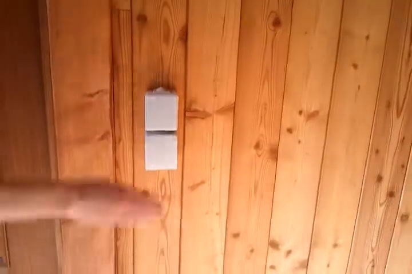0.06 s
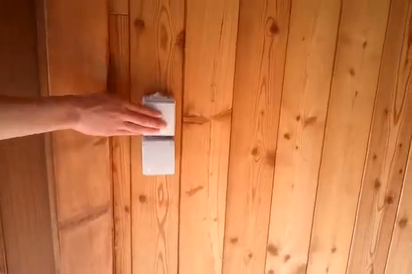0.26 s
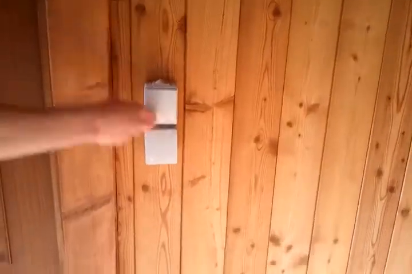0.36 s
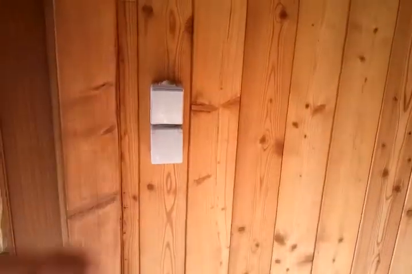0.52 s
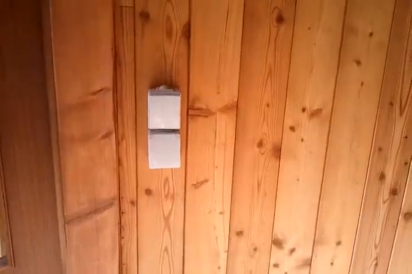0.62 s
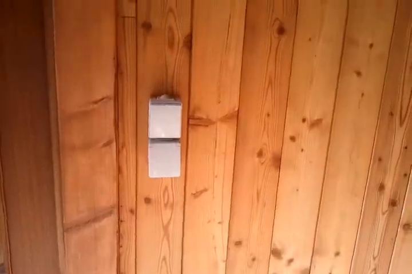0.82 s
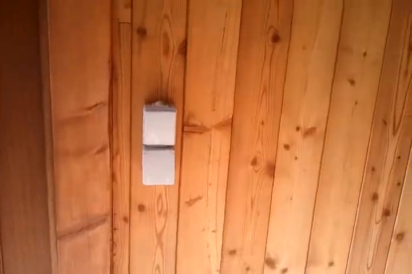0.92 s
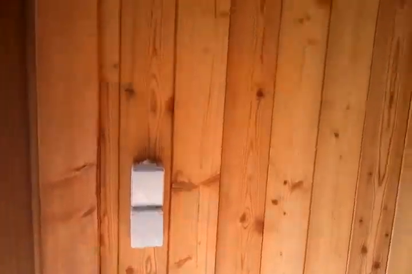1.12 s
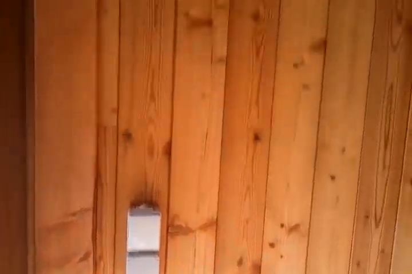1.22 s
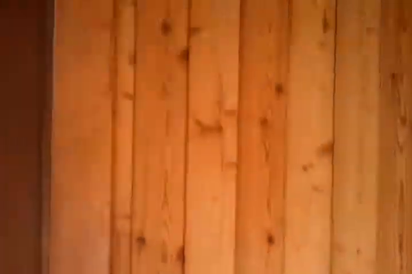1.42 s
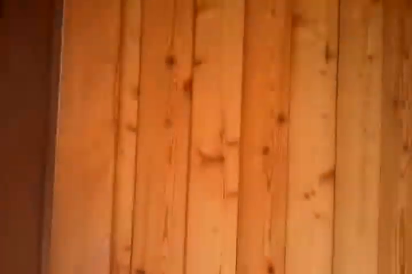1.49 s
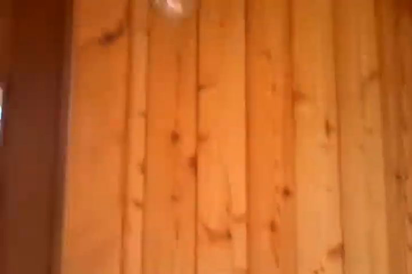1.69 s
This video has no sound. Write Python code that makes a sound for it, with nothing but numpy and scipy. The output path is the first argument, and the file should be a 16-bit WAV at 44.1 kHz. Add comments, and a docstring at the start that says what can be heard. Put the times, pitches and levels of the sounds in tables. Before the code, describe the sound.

A wall switch is pressed with one sharp plastic click, close by, ringing briefly in a small wood-panelled room. Clothing rustles softly afterwards, while birds chirp faintly outside and the hand-held microphone picks up slight bumps.

```python
"""A sharp plastic click, close by: a rocker switch tips, snaps over and chatters on the pine-panelled wall
of a small room, and the boards and the room ring after it. Birds chirp farther off, outside, their calls
scattered by the walls. Clothing rustles as the arm drops. The one microphone, on a hand-held camera,
picks up soft bumps and rumble from the hand over faint outdoor hiss and mains hum."""
import sys
import numpy as np
from scipy import signal
from scipy.fft import rfft, irfft, next_fast_len
from scipy.io import wavfile
from scipy.ndimage import map_coordinates

SR = 44100
rng = np.random.default_rng(int(sys.argv[2]) if len(sys.argv) > 2 else 0)


def output_pcm(signal):
    """Save a mono or channel-first signal as 16-bit PCM at the path in sys.argv[1].

    Samples are clipped to [-1, 1] before scaling.
    """
    pcm = np.clip(np.atleast_2d(signal).T, -1, 1) * 32767
    wavfile.write(sys.argv[1], SR, np.round(pcm).astype(np.int16))


N = 77175

# outdoor hiss as heard indoors (frequency [Hz], level [dB])
AIR_SPECTRUM = [(100, -29.5), (300, -6.5), (800, -11.5), (1600, -13.5), (2200, -7), (2750, 2), (3600, -5.5),
                (4500, -10), (5000, 1.5), (5700, -11.5), (7200, -10), (9000, -19), (14000, -21)]
# mains hum (frequency [Hz], level [dB])
HUM_PARTIALS = [(49.6, -62.5), (99.3, -62.5), (198, -78.5), (301, -79.5)]
# bumps on the camera body (time [s], peak level [dB], width [s])
CAMERA_BUMPS = [(.185, -24.5, 0.00023), (0.1865, -36, 0.0011), (0.31, -30, 0.0013),
                (0.3622, -37.5, 0.00017), (0.542, -36, 0.0031), (0.691, -39, 0.0023),
                (0.714, -35.5, 0.0014), (1.512, -38.5, 0.000039), (1.6645, -24.5, 0.0001)]
# course of the handling rumble (time [s], level [dB])
RUMBLE_LEVELS = [(0.0, -62.5), (0.13, -59), (0.228, -38), (0.276, -42.5), (0.316, -42), (0.336, -44),
                 (0.57, -49.5), (0.628, -67), (0.658, -48), (0.828, -48.5), (0.848, -60.5), (1.106, -55.5),
                 (1.15, -55.5), (1.75, -59)]
# colour of that rumble (frequency [Hz], level [dB])
RUMBLE_SPECTRUM = [(15, 2), (30, 2), (50, 1.5), (75, -7.5), (130, -13.5), (250, -30.5), (500, -47),
                   (1500, -75)]
# strokes of cloth (time [s], rise [s], t60 [s], hiss level [dB], swish level [dB])
CLOTH_STROKES = [(0.116, .006, 0.17, -59.5, -62.5), (0.386, 0.0086, 0.2, -59, -51),
                 (0.522, 0.0049, 0.085, -60, -60), (0.772, 0.02, 0.27, -44.5, -46),
                 (1.146, .01, 0.2, -63, -50.5), (1.15, 0.15, 0.81, -49.5, -68),
                 (1.411, 0.015, 0.15, -59, -66)]
# bright hiss of the cloth (frequency [Hz], level [dB])
HISS_SPECTRUM = [(200, -34), (1200, -16), (2000, -3.5), (2650, 6.5), (3700, -5.5), (6000, -10), (9000, -10),
                 (12000, -14), (14500, -17)]
# lower swish of the cloth (frequency [Hz], level [dB])
SWISH_SPECTRUM = [(60, 0), (350, 2.5), (600, -4), (1500, -7.5), (2300, 0.5), (3200, -2.5), (4300, -1),
                  (6000, -14), (12000, -19.5)]
# single whistles (time [s], length [s], start pitch [Hz], end pitch [Hz], bend [1 = straight glide],
# level [dB], direct sound over the echo [dB])
BIRD_WHISTLES = [(0.011, 0.055, 3300, 5030, 2.3, -53.5, -12), (0.116, 0.024, 2700, 3250, 1.53, -60, 0),
                 (.345, 0.041, 2700, 3765, 0.98, -63, -3.5), (.391, 0.0098, 3180, 3200, 0.76, -59, 6),
                 (0.46, .035, 2670, 3906, 1.47, -59.5, 1.5), (0.567, 0.031, 2710, 3990, 1.07, -58.5, -2),
                 (.634, 0.092, 4470, 5540, 4, -51, 1.5), (0.886, 0.042, 2370, 2860, 1.2, -52.5, -1.5),
                 (0.974, .075, 3133, 4495, 1.3, -53, -19), (1.287, 0.026, 3950, 3350, 1.05, -55, -8),
                 (1.524, 0.048, 5360, 5580, 4.4, -61.5, 2.5), (1.595, 0.029, 2800, 5130, 1.18, -52.5, -14),
                 (1.691, 0.023, 3500, 3140, 1.5, -56.5, 2)]
# falling two-voiced chips (time [s], length [s], upper voice [Hz], lower voice [Hz],
# upper level [dB], lower level [dB])
BIRD_CHIPS = [(0.104, 0.035, 7920, 6250, -57, -60.5), (0.173, 0.028, 7086, 6080, -47.5, -56),
              (0.372, 0.066, 8110, 6300, -56, -60.5), (0.53, 0.049, 8200, 6240, -57.5, -65.5),
              (0.711, 0.052, 8250, 6500, -58.5, -65), (1.108, 0.03, 7470, 6350, -56.5, -60),
              (1.624, 0.072, 7580, 6166, -61, -60.5)]
# reverberation of the small room (frequency [Hz], t60 [s])
ROOM_DECAY = [(200, .26), (1000, 0.22), (2300, 0.2), (6000, .21), (13000, 0.21)]
# colour of the click in the room (frequency [Hz], level [dB])
ECHO_SPECTRUM = [(150, -11), (255, -21), (340, -16), (460, -8), (580, -17.5), (780, -6.5), (980, -15.5),
                 (1400, -4), (1750, -5), (2300, 0), (2800, -13), (3150, -9), (3700, -17), (5600, -18),
                 (6200, -11.5), (7400, -22), (8800, -17.5), (11000, -26), (13000, -24.5), (14500, -35.5)]
# modes of the wall boards (frequency [Hz], level [dB], t60 [s])
BOARD_MODES = [(322.6, -12.5, .26), (446, -10, .28), (750, -7, 0.22), (1410, -7, 0.2), (1616, -6.5, 0.27),
               (1680, -8.5, 0.18), (1864, -4.5, .16), (2050, 4, .16), (2130, -4, .18), (2261, 2, .16),
               (2425, 1.5, .16), (2470, -3.5, .16), (2602, -1.5, 0.094), (3117, -10, 0.18)]
# modes of the plastic rocker and its housing (frequency [Hz], level [dB], t60 [s])
ROCKER_MODES = [(413, -24.5, 0.078), (729, -10.5, 0.018), (1294, -17, 0.052), (1560, -12, 0.029),
                (2182, 0.5, 0.023), (2556, -0.5, 0.019), (3210, -8, .022), (4050, -17, .02),
                (4410, -12, 0.022), (6540, -6.5, 0.013), (7985, -16, 0.031), (8490, -11, 0.018),
                (12540, -38, 0.0096)]
# the rocker tips, then snaps over (time [s], level [dB])
ROCKER_BLOWS = [(0.2068, -20.5), (0.2129, -4)]
# sharp contacts as the mechanism chatters (time [s], level [dB])
CHATTER = [(0.205, -50), (0.2094, -41), (.2135, -14.5), (.2146, -13), (.2158, -21), (.2168, -14),
           (0.2214, -16)]
# crack of each contact (frequency [Hz], level [dB])
CRACK_SPECTRUM = [(200, -8), (1000, -10), (2300, 13), (3700, -11), (4400, -2), (6000, -19), (9000, -1),
                  (11000, -12.5), (12700, -4), (14000, -27)]

SNAP_S = 0.214


def amp(db):
    return 10 ** (np.asarray(db) / 20)


def unit_rms(x):
    return x / np.sqrt(np.mean(x ** 2) + 1e-20)


def along(points, hz):
    """Read (frequency, value) points on a log frequency axis."""
    freqs, values = np.transpose(points)
    return np.interp(np.log(hz + 1), np.log(freqs + 1), values)


def since(s):
    """Seconds since s, zero before it."""
    return np.maximum(np.arange(N) / SR - s, 0)


def fade(t, t60):
    """Decay by 60 dB in t60."""
    return np.exp(-np.log(1000) * t / t60)


def wobble(rate):
    """A smooth random curve, rate knots a second."""
    return map_coordinates(rng.standard_normal(N // 8), [np.arange(N) * rate / SR], mode="wrap")


def filtered(x, response):
    """Shape x by a gain that depends on frequency."""
    size = next_fast_len(N + SR // 2)
    return irfft(rfft(x, size) * response(np.fft.rfftfreq(size, 1 / SR)), size)[:N]


def noise(spectrum):
    """Coloured noise of rms 1."""
    return unit_rms(filtered(rng.standard_normal(N), lambda hz: amp(along(spectrum, hz))))


def room_tone():
    """Faint mains hum under gently wavering hiss from outdoors."""
    t = since(0)
    hum = sum(amp(db) * unit_rms(np.sin(2 * np.pi * (hz * t + rng.random()))) for hz, db in HUM_PARTIALS)
    return hum + amp(-59.5 + wobble(7.27)) * noise(AIR_SPECTRUM)


def handling():
    """Right at the microphone: dull bumps and rumble from the hand on the camera."""
    t = since(0)
    bumps = sum(amp(db) * np.exp(-np.abs(t - s) / width) for s, db, width in CAMERA_BUMPS)
    rumble_db = 1.5 + np.interp(t, *np.transpose(RUMBLE_LEVELS))
    return bumps + amp(rumble_db) * noise(RUMBLE_SPECTRUM)


def bird_note(s, length, start_hz, end_hz, bend):
    """One gliding bird tone, slightly unsteady in pitch and level."""
    progress = np.clip(since(s) / length, 0, 1)
    glide_hz = end_hz + (start_hz - end_hz) * (1 - progress) ** bend
    hz = glide_hz * (1 + 0.006 * wobble(250))
    arch = np.sqrt(2 * np.abs(np.sin(np.pi * progress)))
    flutter = amp(2 * wobble(120))
    return arch * flutter * np.sin(2 * np.pi * np.cumsum(hz) / SR)


def from_outside(call, direct_db):
    """A call reaches the microphone partly direct, partly scattered by the walls."""
    t = since(0)[:SR // 4]
    tail = rng.standard_normal(len(t)) * fade(t, t60=0.17)
    return amp(direct_db) * call + signal.fftconvolve(call, tail / np.linalg.norm(tail))[:N]


def birds():
    """Farther off, outside: clear whistles and slightly raspy chips that fall in pitch."""
    whistles = sum(from_outside(amp(db) * bird_note(s, length, start, end, bend), direct_db)
                   for s, length, start, end, bend, db, direct_db in BIRD_WHISTLES)
    rasp = 1 + 0.45 * np.sin(2 * np.pi * 650 * since(0) + wobble(360))
    chips = sum(amp(db) * bird_note(s, length, hz, end_hz=0.925 * hz, bend=1.3)
                for s, length, upper, lower, upper_db, lower_db in BIRD_CHIPS
                for hz, db in [(upper, upper_db), (lower, lower_db)])
    return whistles + from_outside(rasp * chips, direct_db=-5)


def clothing():
    """Near the microphone, cloth rubs in grainy strokes that swell and die away."""
    hiss, swish = noise(HISS_SPECTRUM), noise(SWISH_SPECTRUM)
    strokes = np.zeros(N)
    for s, rise, t60, hiss_db, swish_db in CLOTH_STROKES:
        envelope = np.minimum(since(s) / rise, 1) * fade(since(s + rise), t60)
        strokes += envelope * (amp(hiss_db) * hiss + amp(swish_db) * swish)
    grain = amp(1.5 * wobble(500))
    return strokes * grain


def room_echo(s):
    """The small room answers from time s, each frequency dying away at its own rate."""
    hz, t, bands = signal.stft(noise(ECHO_SPECTRUM), SR, nperseg=256)
    decay = fade(t, along(ROOM_DECAY, hz)[:, None])
    tail = signal.istft(bands * decay, SR)[1][:N]
    attack = 1 - np.exp(-since(0) / 0.0017)
    return np.pad(tail * attack, (round(s * SR), 0))[:N]


def ring(modes, s, attack_s):
    """A body struck at time s rings in its decaying modes."""
    t = since(s)
    attack = 1 - np.exp(-t / attack_s)
    return attack * sum(amp(db) * fade(t, t60) * np.sin(2 * np.pi * hz * t) for hz, db, t60 in modes)


def switch():
    """Close by, the rocker rings and its contacts crack; the snap sets boards and room ringing."""
    rocker = sum(amp(db) * ring(ROCKER_MODES, s, attack_s=0.0018) for s, db in ROCKER_BLOWS)
    chatter = sum(amp(db) * (since(s) > 0) * fade(since(s), t60=0.0071) for s, db in CHATTER)
    cracks = chatter * noise(CRACK_SPECTRUM)
    boards = amp(-27.5) * ring(BOARD_MODES, SNAP_S, attack_s=0.003)
    echo = amp(-20) * room_echo(SNAP_S + 0.002)
    return rocker + cracks + boards + echo


def scene():
    """Everything at the one microphone in the room."""
    return (switch() + birds() + clothing() + handling() + room_tone())[None]


def record(dry):
    """The camera rounds off the highest peaks and cuts the treble above its band limit."""
    ceiling, top_hz = 0.75, 14950
    rounded = dry[0] / (1 + (dry[0] / ceiling) ** 6) ** (1 / 6)
    return filtered(rounded, lambda hz: np.clip((top_hz - hz) / 300 + 0.5, 0, 1))[None]


dry = scene()
out = record(dry)
output_pcm(out)
```